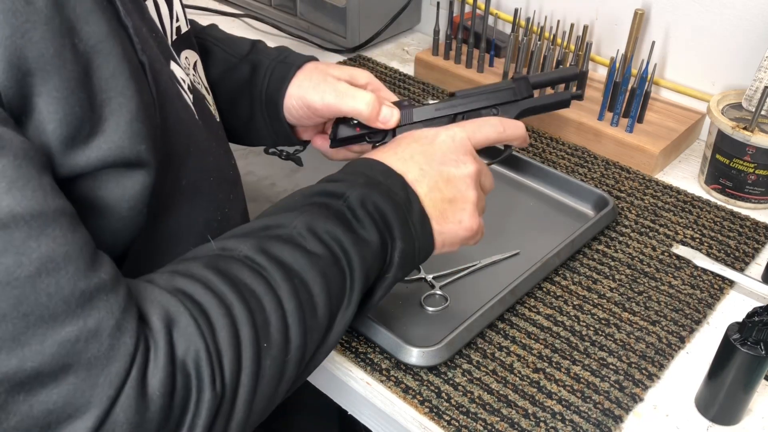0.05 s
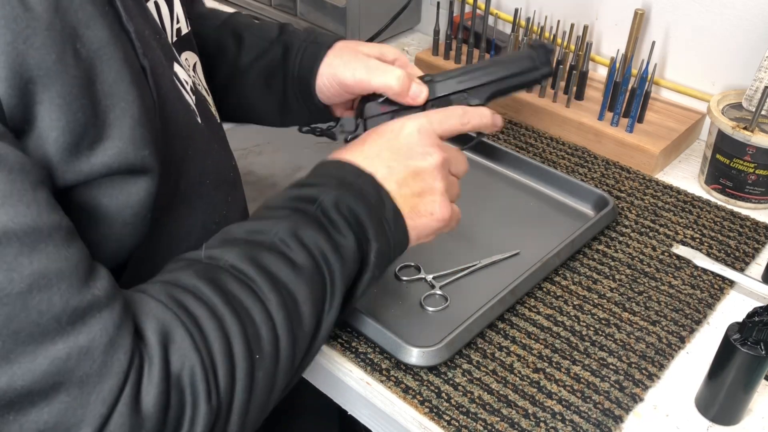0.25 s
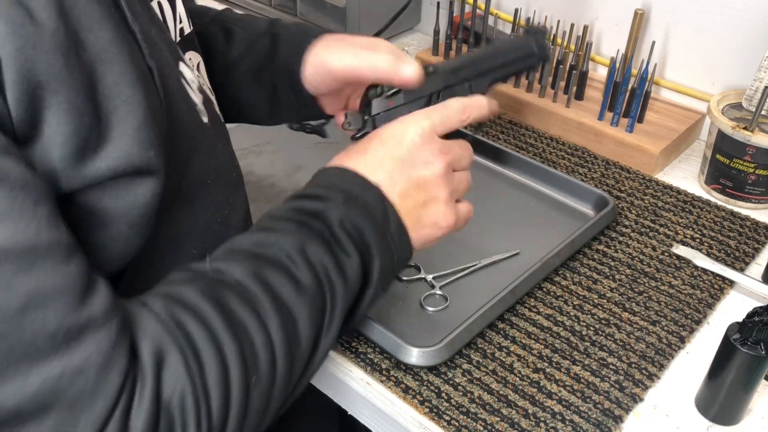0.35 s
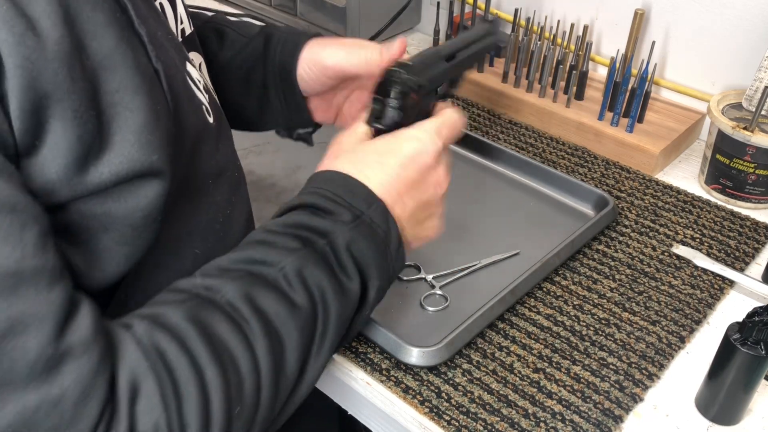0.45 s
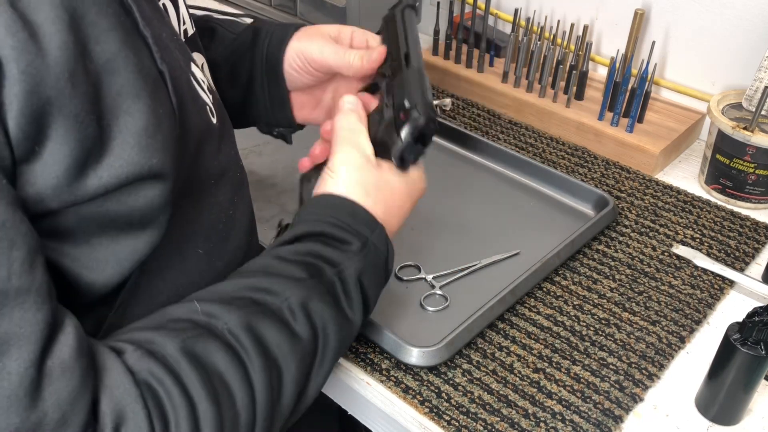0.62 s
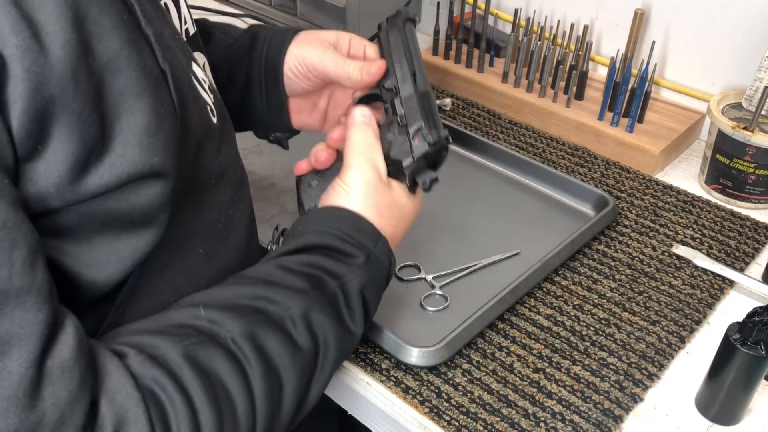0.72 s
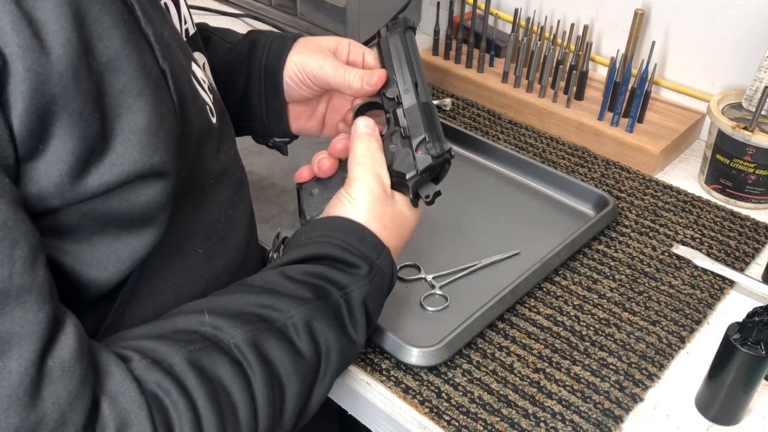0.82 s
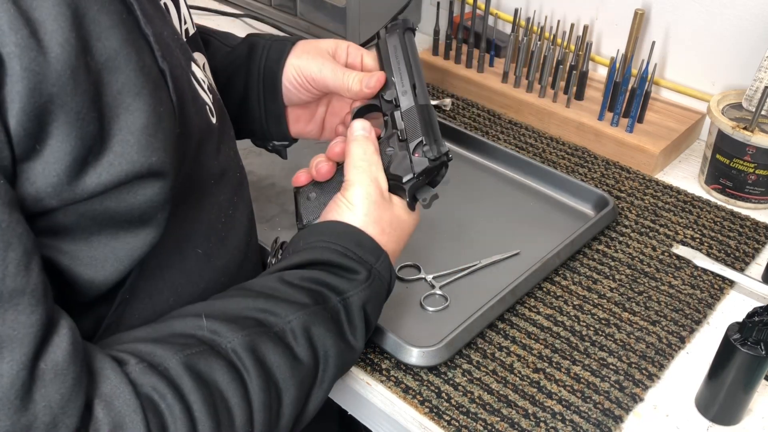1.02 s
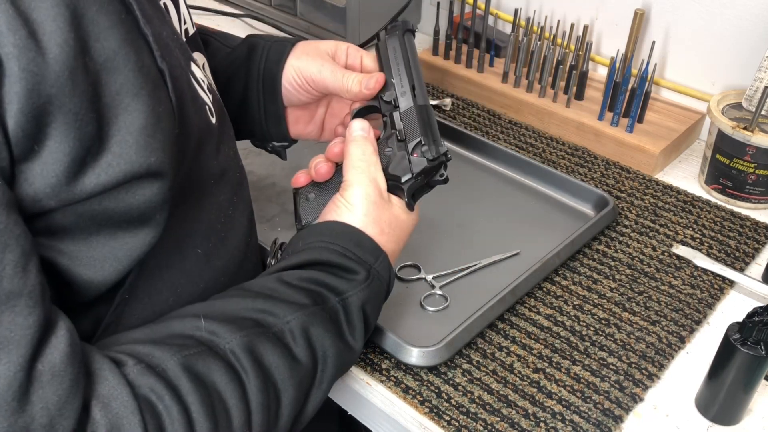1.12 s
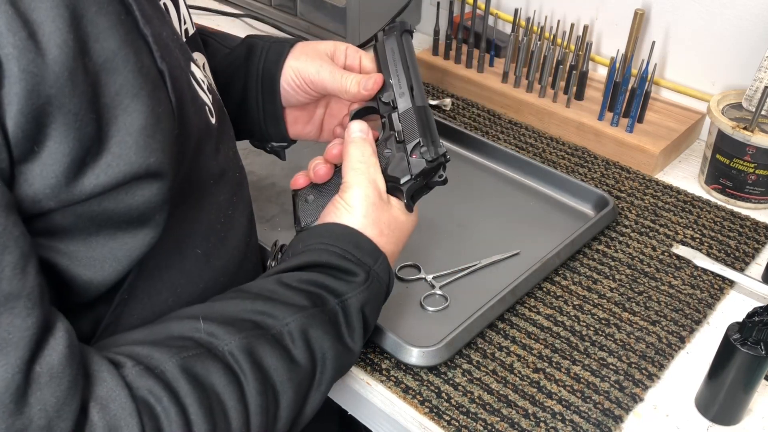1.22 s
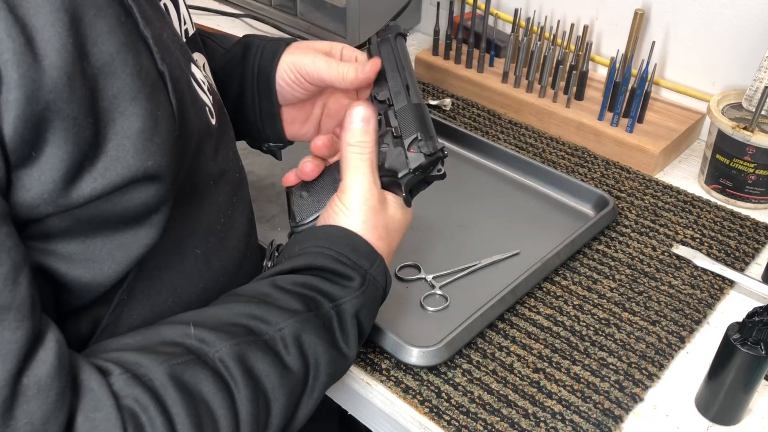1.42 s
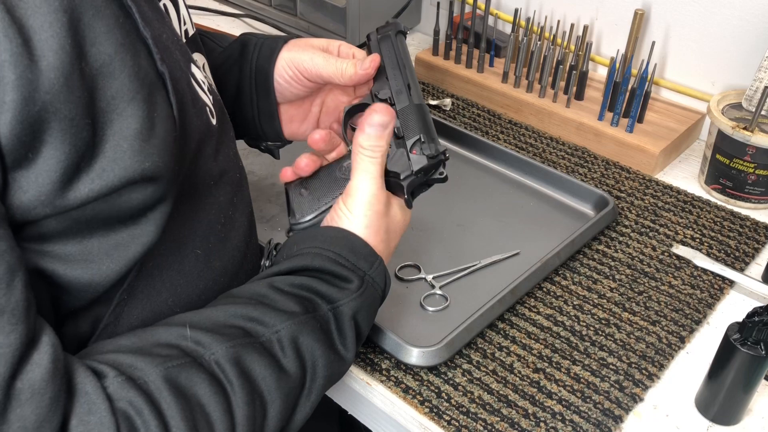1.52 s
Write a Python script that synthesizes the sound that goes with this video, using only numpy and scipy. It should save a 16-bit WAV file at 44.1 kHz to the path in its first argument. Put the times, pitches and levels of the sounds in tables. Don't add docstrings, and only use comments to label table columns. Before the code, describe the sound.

A pistol's metal slide is racked by hand, slamming back, then snapping shut in an echoing workshop.

```python
import sys
import numpy as np
from scipy import signal
from scipy.fft import rfft, irfft
from scipy.io import wavfile

SR = 44100
rng = np.random.default_rng(int(sys.argv[2]) if len(sys.argv) > 2 else 0)


def inscribe(sig):
    pcm = np.round(np.clip(np.atleast_2d(sig).T, -1, 1) * 32767)
    wavfile.write(sys.argv[1], SR, pcm.astype(np.int16))


def gain_from_decibels(decibels):
    exponent = np.asarray(decibels, float) / 20
    return 10 ** exponent


N = 68355
LEAD = SR // 4

# frequency in Hz, t60 in seconds.
STEEL_MODES = [(1170, .012), (1680, .012), (2200, .025), (2450, .022), (2730, .018), (2955, .018),
               (3500, .018), (4500, .03), (4900, .012), (5400, .022), (5850, .028), (6280, .025),
               (8800, .022), (10600, .02)]
# slam in dB, snap in dB, catch in dB.
MODE_DRIVE = [(-10, -54, -34), (-30, -5, 5.5), (-1.5, -8.5, 0.5), (-4, -3, -11), (-8, -12, -7.5),
              (-10, -25, -9), (-23.5, -10.5, -0.5), (-9.5, -3, -21), (-8.5, -33, 9.5), (-12.5, -12, -12),
              (-10.5, -3, -6), (-6, -7.5, -17), (1, -17, -32), (-4, -14.5, -30.5)]
SLAM, SNAP, CATCH = 0, 1, 2
MODE_SCATTER_DB = 7
KNOCKS_PER_S, KNOCK_SPREAD_DB = 16000, -0.5

# start in seconds, level in dB, centre of the knock in Hz, rattle t60 in seconds.
EARLIER_CONTACTS = [
    (-.06, -14, 2600, 0.063),
    (-.055, -24.5, 7000, .04),
    (-.05, -36, 1170, 0.019),
    (-.045, -26.5, 550, .04),
]
SLAM_CONTACTS = [(.177, -43, 2300, .06), (.185, -37, 3200, .09), (.1852, -50, 900, .06),
                 (.1976, -36, 5000, .02), (.1997, -9, 4500, .035), (.1999, -9, 2600, .04),
                 (.2001, -22, 12000, .03), (.2025, -16, 8500, .03), (.2075, -15, 6000, .015),
                 (.2086, -44, 140, .02), (.2088, -35, 330, .02), (.2092, -2, 3000, .004),
                 (.2095, -27, 650, .02), (.2097, -24, 1300, .02), (.2145, -13, 2400, .03)]
SNAP_CONTACTS = [(1.0155, -42, 5000, .03), (1.018, -24, 5500, .005), (1.0207, -34, 2800, .01),
                 (1.0222, -7, 6500, .015), (1.0224, -21, 14000, .03), (1.0225, -10, 4500, .03),
                 (1.0226, -31, 400, .02), (1.0228, -25, 700, .02), (1.0229, -14, 2300, .004),
                 (1.0231, -19, 1250, .015), (1.0253, -10, 9000, .025), (1.030, -14, 6500, .03)]
CATCH_CONTACTS = [
    (1.392, -25, 5000, .018),
    (1.3922, -37, 11000, .03),
    (1.393, -43, 800, .03),
    (1.3935, -37, 1800, .04),
    (1.394, -33, 3200, .03),
    (1.4005, -31, 6500, .015),
]
HANDLING_CONTACTS = [(.718, -67, 5000, .01), (.749, -69, 5500, .04), (.846, -71, 4000, .02),
                     (.877, -69, 5200, .01), (.957, -69, 4500, .02), (.97, -72, 5000, .06),
                     (1.337, -41, 8500, .004), (1.3375, -53, 4500, .02), (1.339, -56, 2500, .04),
                     (1.345, -59, 3000, .02), (1.3565, -53, 4600, .01), (1.3605, -53, 4200, .015),
                     (1.364, -56, 3100, .02)]

# frequency in Hz, t60 in seconds, level in dB.
ROOM_BANDS = [(150, 0.26, -19.5), (500, 0.47, -3.5), (1400, 0.58, 1), (2330, 0.49, -2.96),
              (4400, 0.56, -3.5), (7000, 0.46, -2.5), (10500, .42, -3), (15500, 0.11, 19)]
ROOM_DB, ROOM_DELAY_S, ROOM_RISE_S, ROOM_TOP_HZ = -1, .005, .006, 16200
SIDEWAYS_RING_DB = -7

# frequency in Hz, level in dB per Hz.
AIR_COLOUR = [(60, -33.5), (160, -7.5), (300, -4), (1000, -12), (2200, -14), (4500, -21.5), (9000, -27),
              (16000, -36)]
AIR_DB = -69.5
# time in seconds, level in dB.
DRAUGHT_SWELL = [(0, -62), (.3, -64), (.6, -61), (.9, -64), (1.2, -63), (1.3, -56), (1.34, -51), (1.4, -58),
                 (1.47, -53), (1.55, -58)]
# frequency in Hz, level in dB per Hz.
DRAUGHT_COLOUR = [(12, 1), (25, 3.8), (45, -5.5), (60, -11.5), (90, -17.5), (120, -12), (200, -24),
                  (320, -55.5)]
# frequency in Hz, level in dB, width in Hz, start in seconds.
HUM_TONES = [
    (481, -76, 6, .76),
    (1122, -79, 5, .66),
    (360, -85, 8, .5),
]

MIC_TOP_HZ, MIC_CEILING = 16800, 1.3


def resonance(x, hz, width):
    r = np.exp(-np.pi * width / SR)
    feedback = [1, -2 * r * np.cos(2 * np.pi * hz / SR), r * r]
    return signal.lfilter([(1 - r * r) / 2, 0, (r * r - 1) / 2], feedback, x)


def rattle(hz, t60, width):
    size = SR // 10
    t = np.arange(size) / SR
    struck = rng.random(size) < KNOCKS_PER_S / SR
    push = rng.choice([-1, 1], size)
    knocks = struck * push * gain_from_decibels(KNOCK_SPREAD_DB * rng.standard_normal(size))
    knocks[0] = 1
    force = knocks * gain_from_decibels(-60 * t / max(t60, .002)) + 1e-18
    for _ in range(2):
        force = resonance(force, hz, hz * width)
    return force


def steel_ring(force, blow):
    ring = 0
    scatter_db = MODE_SCATTER_DB * rng.standard_normal(len(STEEL_MODES))
    for k, (hz, t60) in enumerate(STEEL_MODES):
        r, w = gain_from_decibels(-60 / (t60 * SR)), 2 * np.pi * hz / SR
        mode = signal.lfilter([0, np.sin(w)], [1, -2 * r * np.cos(w), r * r], force)
        ring = ring + (-1) ** k * gain_from_decibels(MODE_DRIVE[k][blow] + scatter_db[k]) * mode
    return ring


def contacts(rows, blow, ring_db, width):
    out = np.zeros(N + LEAD + SR)
    for start, db, hz, t60 in rows:
        force = rattle(hz, t60, width)
        ring = steel_ring(force, blow)
        at = int(start * SR) + LEAD
        out[at:at + len(force)] += gain_from_decibels(db) * (gain_from_decibels(ring_db) * ring + force) / np.abs(force).max()
    return out[:N + LEAD]


def pistol(extra_db):
    slam = contacts(SLAM_CONTACTS, SLAM, ring_db=-23.5 + extra_db, width=1.0)
    snap = contacts(SNAP_CONTACTS, SNAP, ring_db=-24 + extra_db, width=1.0)
    catch = contacts(CATCH_CONTACTS, CATCH, ring_db=-39.5 + extra_db, width=0.86)
    earlier = contacts(EARLIER_CONTACTS, SLAM, ring_db=-42.5, width=1.0)
    handling = contacts(HANDLING_CONTACTS, CATCH, ring_db=-34, width=.4)
    return slam + snap + catch + earlier + handling


def at_hz(hz, points, axis=1):
    points = np.array(points)
    return np.interp(np.log(hz + 1), np.log(points[:, 0]), points[:, axis])


def room(x):
    t, echo = np.arange(SR) / SR, 0
    edges = 100 * 2 ** np.arange(0, 7.6, .5)
    for low, high in zip(edges, edges[1:]):
        hz = np.sqrt(low * high)
        band_filter = signal.butter(2, [low, high], "band", fs=SR, output="sos")
        band = signal.sosfilt(band_filter, rng.standard_normal(SR))
        echo = echo + band * gain_from_decibels(at_hz(hz, ROOM_BANDS, axis=2) - 60 * t / at_hz(hz, ROOM_BANDS))
    echo = echo * (1 - np.exp(-np.maximum(t - ROOM_DELAY_S, 0) / ROOM_RISE_S))
    echo = echo / np.sqrt(np.sum(echo ** 2))
    return gain_from_decibels(ROOM_DB) * signal.fftconvolve(x, echo)[:len(x)]


def walls():
    heard = sum(room(pistol(extra_db=SIDEWAYS_RING_DB)) for wall in range(5)) / np.sqrt(5)
    return signal.sosfilt(signal.cheby2(10, 50, ROOM_TOP_HZ, fs=SR, output="sos"), heard)


def rms_one(x):
    return x / np.sqrt(np.mean(x ** 2) + 1e-30)


def coloured(spectrum):
    hz = np.arange(N // 2 + 1) * SR / N
    white = rfft(rng.standard_normal(N))
    return rms_one(irfft(white * gain_from_decibels(at_hz(hz, spectrum)) * (hz > 12), N))


def still_air():
    return gain_from_decibels(AIR_DB) * coloured(AIR_COLOUR)


def draught():
    swell_db = np.interp(np.arange(N) / SR, *np.transpose(DRAUGHT_SWELL))
    return gain_from_decibels(swell_db) * coloured(DRAUGHT_COLOUR)


def far_hum():
    t, out = np.arange(N) / SR, 0
    for hz, db, width, start in HUM_TONES:
        tone = rms_one(resonance(rng.standard_normal(N), hz, width))
        onset = np.clip((t - start) / 0.015, 0, 1)
        out = out + gain_from_decibels(db) * tone * onset * gain_from_decibels(-12.0 * np.maximum(t - start, 0))
    return out


def scene():
    direct = pistol(extra_db=0)
    background = still_air() + draught() + far_hum()
    return ((direct + walls())[LEAD:] + background)[None]


def roll_off(x):
    return signal.sosfilt(signal.butter(12, 16810, fs=SR, output="sos"), x)


def record(dry):
    rounded = MIC_CEILING * np.tanh(dry / MIC_CEILING)
    mix = signal.sosfilt(signal.cheby2(10, 60, MIC_TOP_HZ, fs=SR, output="sos"), rounded)
    return roll_off(mix)


dry = scene()
out = record(dry)
inscribe(out)
```